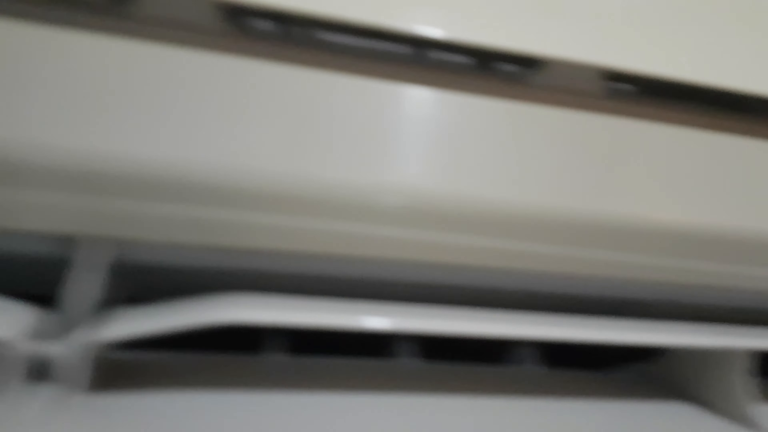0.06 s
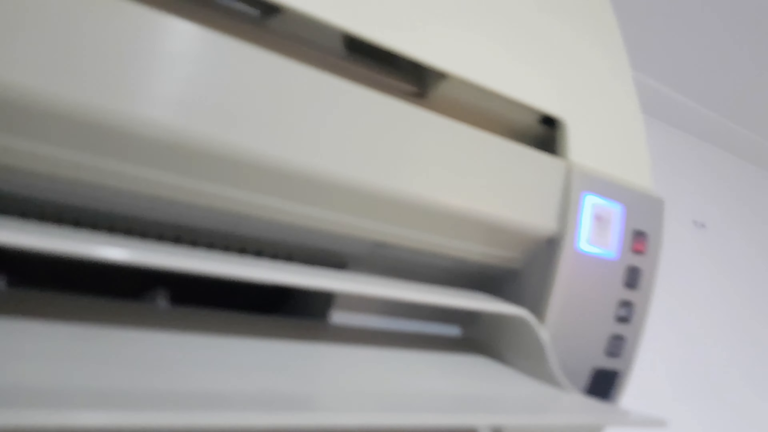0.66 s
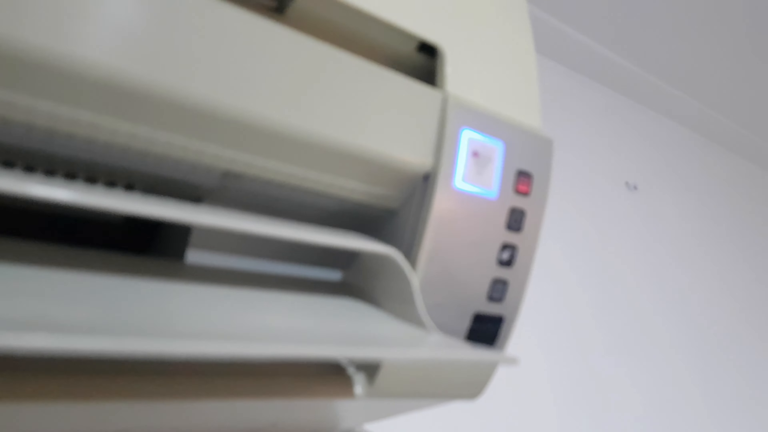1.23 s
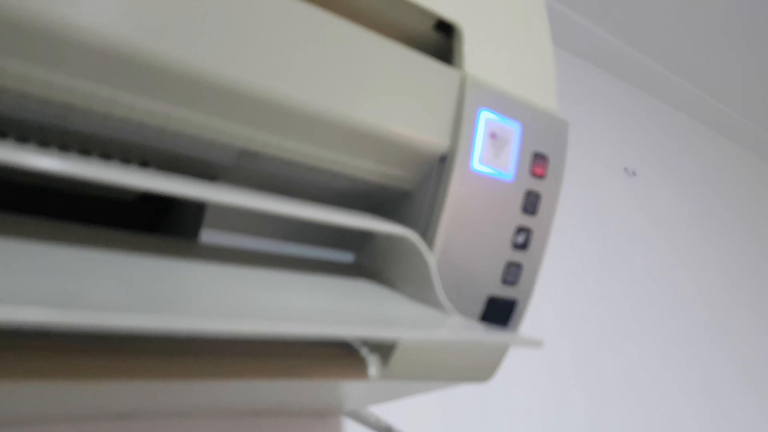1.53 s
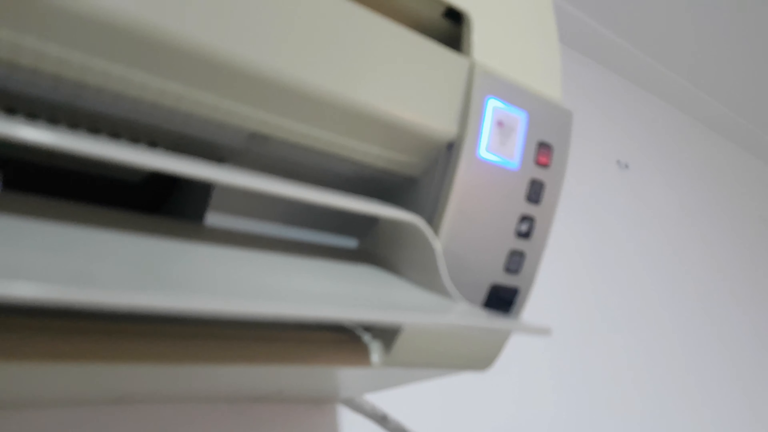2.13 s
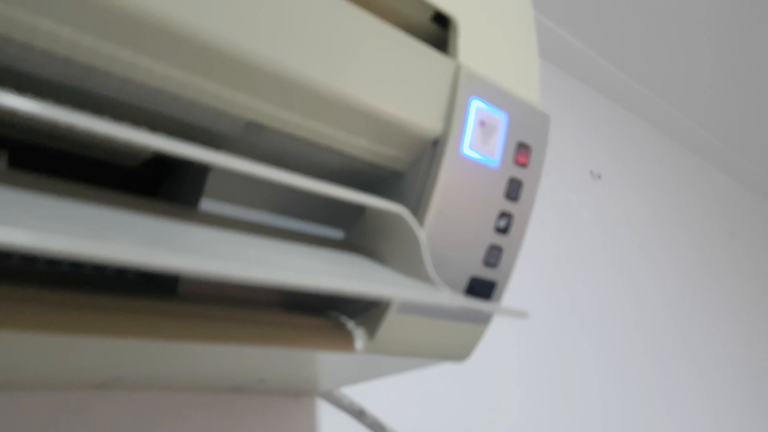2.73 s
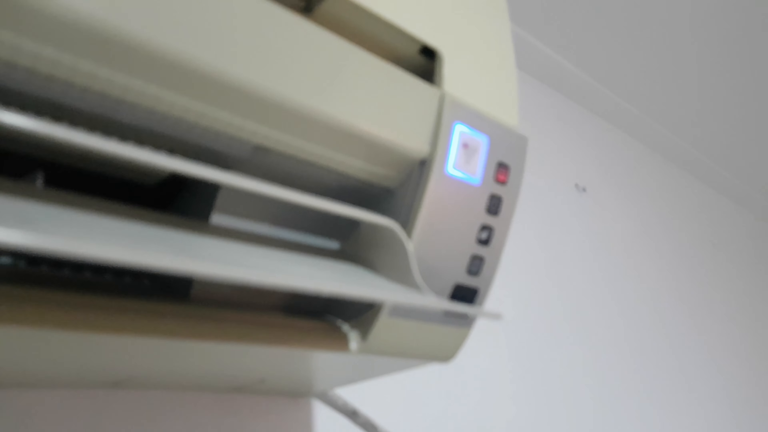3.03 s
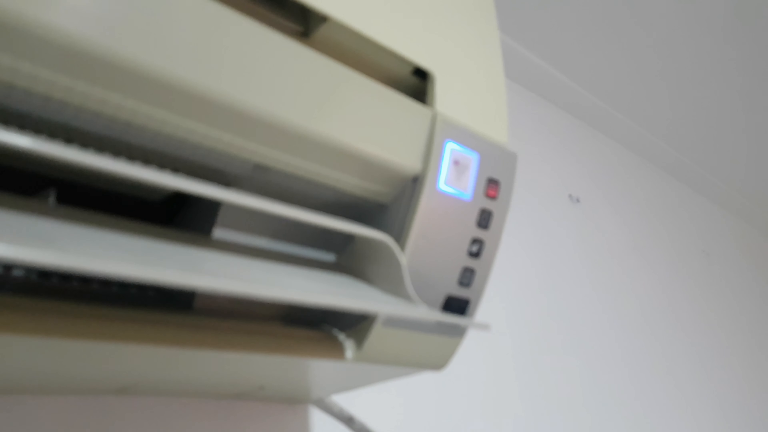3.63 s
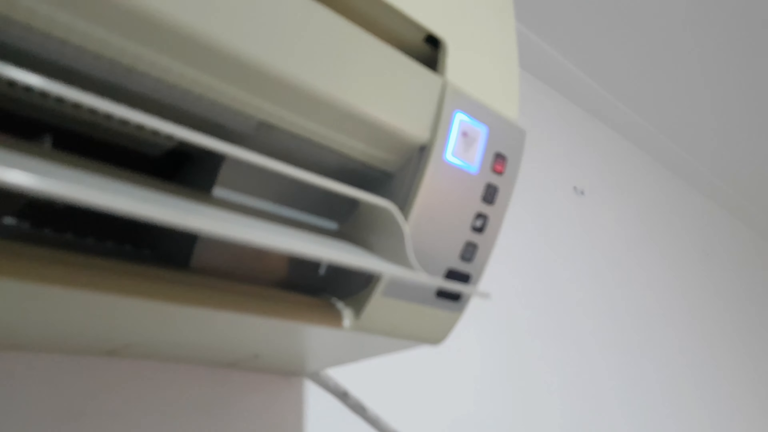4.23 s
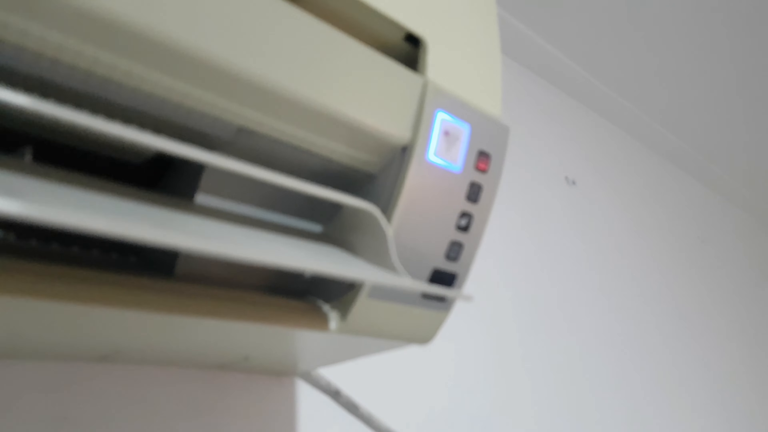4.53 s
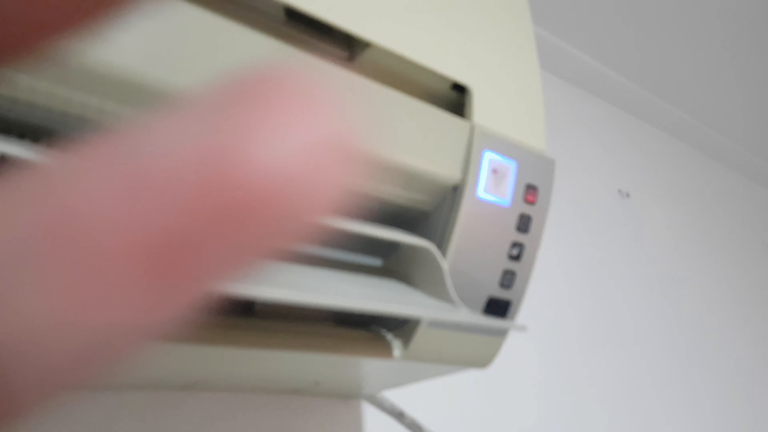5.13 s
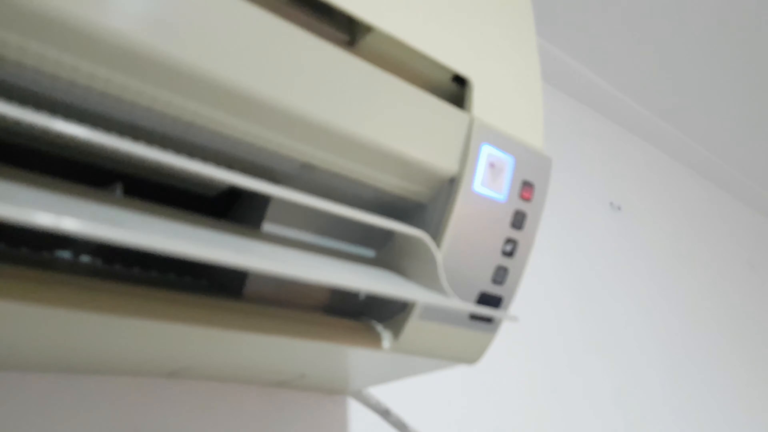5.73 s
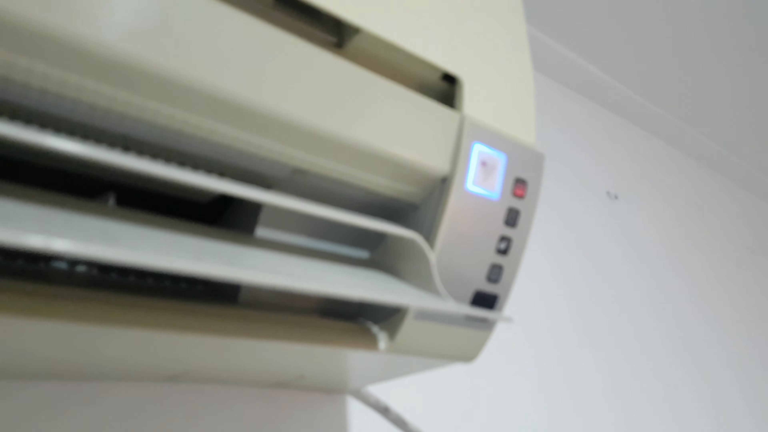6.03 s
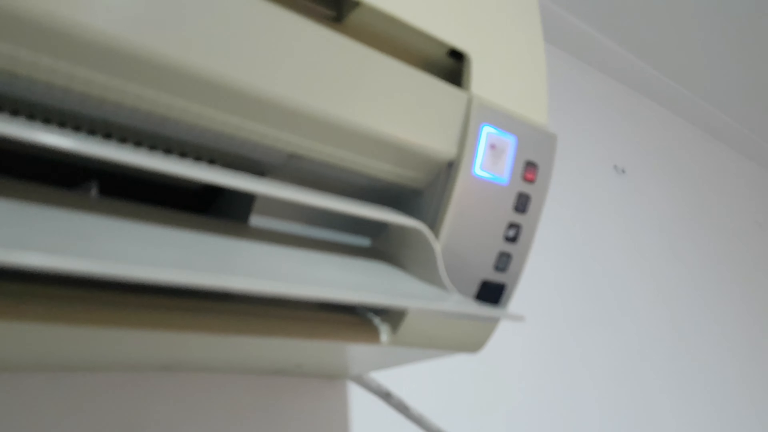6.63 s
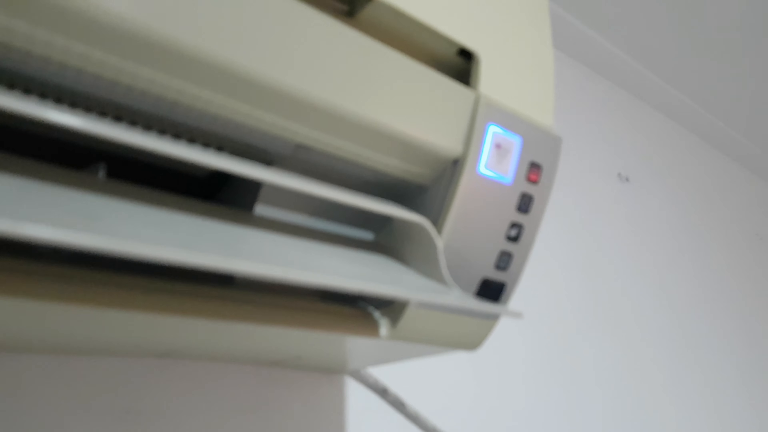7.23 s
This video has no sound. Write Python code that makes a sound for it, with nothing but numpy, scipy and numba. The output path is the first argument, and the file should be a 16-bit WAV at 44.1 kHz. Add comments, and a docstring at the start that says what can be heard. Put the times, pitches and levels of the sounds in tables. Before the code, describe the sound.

From the start, air from a wall air conditioner blows onto a hand-held microphone indoors, making an uneven, fluttering buffet with round thumps and small crackles over a low rumble, a little stronger on the left. Behind it the blower rushes steadily, the vents hiss softly, and a tiny, rapid, high ticking comes and goes very faintly. The wind swells from about 3 seconds, is strongest between 4 and 4.7 seconds, and eases towards 5 seconds, with a brief gust just after. At about 5.3 and 5.6 seconds, two sharp plastic clicks sound close by, mostly on the left, and a few faint crackles follow the second click. The airflow keeps fluttering at a lower level, then builds again from about 6.7 seconds until the end, a little after 7 seconds.

```python
"""A wall air conditioner blows at a hand-held phone. From the start the air stream breaks into eddies on
both microphone ports: a fluttering buffet with round thumps and crackles over a low rumble. Behind it
the blower rushes, the louvres hiss and something in the phone, likely its lens motor, ticks faintly.
The wind swells from about 3 s and eases towards 5 s. At 5.3 and 5.6 s plastic clicks close by, and a
few faint crackles follow the second click; then the wind builds again to the end."""
import sys
import numpy as np
from scipy import signal
from scipy.fft import rfft, irfft, next_fast_len
from scipy.io import wavfile
from scipy.ndimage import uniform_filter1d
from numba import njit

SR = 44100
rng = np.random.default_rng(int(sys.argv[2]) if len(sys.argv) > 2 else 0)


def materialize(psi):
    """Save the field psi as 16-bit PCM at rate SR to the path in sys.argv[1].

    A 1-D psi becomes a single channel; in a 2-D psi each row is a channel.
    """
    bounded = np.clip(np.atleast_2d(psi).T, -1, 1)
    quanta = np.round(bounded * 32767).astype(np.int16)
    wavfile.write(sys.argv[1], SR, quanta)


N = 320607
TIME = np.arange(N) / SR

# The tone of a microphone port. Each row: frequency in Hz, gain in dB.
PORT_RESPONSE = [(30, -16), (100, -5.5), (200, -1.5), (350, -0.5), (600, -3.5), (1100, -3), (2100, -0.5),
                 (2800, -4), (4500, -9), (9000, -32.5), (15000, -47)]


def undb(db):
    """Decibels to gain."""
    return 10 ** (np.asarray(db) / 20)


def curves(table):
    """One envelope per column after the first, which is time in seconds; straight lines between rows."""
    s, *columns = np.transpose(table)
    return [np.interp(TIME, s, c) for c in columns]


def unit_rms(x):
    """Scale each channel to rms 1."""
    return x / np.sqrt(np.mean(x ** 2, axis=-1, keepdims=True))


def pan(pan_db):
    """Constant-power left and right gains; pan is left minus right in dB."""
    gains = undb(np.outer([.5, -.5], pan_db))
    return gains / np.sqrt(np.mean(gains ** 2, axis=0))


def noise():
    """Unrelated white noise for the two ports."""
    return rng.standard_normal((2, N))


def colour(x, points):
    """Equalise along a curve of (Hz, dB) points."""
    hz, db = np.transpose(points)
    size = next_fast_len(N + 4096)
    bins_hz = np.maximum(np.arange(size // 2 + 1) * SR / size, 1)
    gain = undb(np.interp(np.log(bins_hz), np.log(hz), db))
    return irfft(rfft(x, size) * gain, size)[..., :N]


def drift(rate):
    """Smooth random motion of rms 1 for each port, changing about rate times a second."""
    size = max(int(SR / rate), 2)
    smoothed = uniform_filter1d(noise(), size, mode="wrap")
    return unit_rms(uniform_filter1d(smoothed, size, mode="wrap"))


def bounded(x, limit=2):
    """Round off the extremes."""
    return limit * np.tanh(x / limit)


def ring(x, hz, width_hz):
    """A resonance with gain 1 at its centre."""
    return signal.lfilter(*signal.iirpeak(hz, hz / width_hz, fs=SR), x)


def burst(start, rise_s, fall_s):
    """An envelope with exponential attack and decay."""
    age = np.maximum(TIME - start, 0)
    return (1 - np.exp(-age / rise_s)) * np.exp(-np.minimum(age / fall_s, 50))


@njit
def lowpass(x, hz, damping):
    """State-variable low-pass whose corner moves every sample."""
    y, band, low = np.empty(len(x)), 0., 0.
    for i in range(len(x)):
        g = np.tan(np.pi * min(hz[i], .4 * SR) / SR)
        v = (band + g * (x[i] - low)) / (1 + g * (g + damping))
        y[i] = low + g * v
        band, low = 2 * v - band, 2 * y[i] - low
    return y


def lens_motor(first_s=.0332, period_s=.06003, fall_s=.003, scatter_db=1.8, gain_db=12.5):
    """Evenly spaced motor steps, each a tiny rattle in a few high modes."""
    # The ticking's fader. Each row: time in seconds, relative level in dB.
    tick_levels = [(0, -75), (1.0, -67), (1.7, -67), (2.08, -57.5), (2.35, -55), (2.7, -58), (3.0, -59),
                   (3.5, -55.5), (3.7, -67), (4.5, -69), (5.4, -63), (6.4, -69.5), (7.27, -59.5)]
    # The modes that a step rings. Each row: frequency in Hz, width in Hz, gain in dB.
    lens_modes = [(6150, 250, 5), (6600, 250, 4), (7600, 2600, -1), (10750, 200, -2), (11350, 350, 4),
                  (12500, 5000, -22)]
    tick_db, = curves(tick_levels)
    age = (TIME - first_s) % period_s
    steps = noise() * np.exp(-age / fall_s)
    ticks = sum(undb(db) * ring(steps, hz, width) for hz, width, db in lens_modes)
    return ticks * undb(tick_db + gain_db + scatter_db * drift(13)) * pan(2)


def conditioner_noise(direct_share=.12, lag_s=.0005):
    """Air noise at the ports: part comes straight, reaching the left first, the rest via the room."""
    source = rng.standard_normal(N)
    direct = np.array([source, np.roll(source, int(lag_s * SR))])
    return np.sqrt(direct_share) * direct + np.sqrt(1 - direct_share) * noise()


def blower(rush_gain_db=17, hiss_gain_db=-3, waver_db=2.5):
    """The fan wheel's rush, the hiss of air through the louvres, and a thin hiss on the left."""
    # Three faders. Each row: time in seconds, relative levels in dB of rush, louvre hiss and thin hiss.
    air_levels = [(0, -60, -64, -63), (.35, -53.5, -65, -64), (1.2, -52, -76, -58.5), (2, -50, -65, -58.5),
                  (3.5, -49, -63, -60), (4, -50, -82, -57.5), (4.1, -50.5, -74, -61),
                  (4.7, -49.5, -78, -70.5), (5, -54.5, -63.5, -72), (5.5, -54.5, -66, -88),
                  (5.9, -55.5, -67.5, -87), (6.6, -55, -68, -91), (6.9, -50.5, -63, -69),
                  (7.27, -52, -64, -61)]
    # The tone of each layer. Each row: frequency in Hz, spectral level in dB.
    rush_spectrum = [(40, -0.5), (120, -0.5), (400, 10), (800, 3), (1200, -4), (1700, -5.5), (2600, -9.5),
                     (3150, -19.5), (3900, -21), (4800, -29.5), (7000, -31), (12000, -49.5)]
    louvre_spectrum = [(2000, -17), (4500, -2.5), (6500, -1), (8000, -4.5), (9500, -7), (11500, -3.5),
                       (12300, -11), (15500, -8)]
    thin_spectrum = [(3000, -7.5), (5000, 3), (8000, 0), (9800, 3), (11500, -2.5), (12500, -11),
                     (15500, -14)]
    rush_db, louvre_db, thin_db = curves(air_levels)
    rush = unit_rms(colour(conditioner_noise(), rush_spectrum))
    rush *= undb(rush_db + rush_gain_db + waver_db * drift(26))
    louvres = unit_rms(colour(conditioner_noise(), louvre_spectrum)) * undb(louvre_db + hiss_gain_db)
    thin = unit_rms(colour(noise(), thin_spectrum)) * undb(thin_db + hiss_gain_db)
    return rush + louvres + thin * np.array([[1], [0]])


def gusts():
    """The stream's rise and fall in dB: each gust swells out of a short lull and drops into another."""
    # Distinct gusts. Each row: centre in seconds, rise in dB, half length in seconds.
    surges = [(0.128, 1, 0.042), (0.403, 3.5, 0.025), (0.671, 2, 0.07), (1.366, 2.5, 0.022),
              (2.094, 3, 0.055), (2.248, 8, 0.0078), (3.387, 6, 0.017), (3.499, 2, 0.076), (3.662, 1, 0.06),
              (3.827, 1.5, 0.037), (4.107, 3, 0.047), (4.928, 3, 0.072), (5.031, 9.5, 0.044),
              (5.126, 9.5, 0.058), (5.202, 6.5, 0.03), (5.342, 1, 0.083), (5.624, 3, 0.018),
              (5.67, 3, 0.035), (5.96, 5, 0.023), (6.113, 5, 0.016), (6.158, 4, 0.042), (6.376, 6.5, 0.019),
              (6.445, 4.5, 0.041), (6.536, 0.5, 0.03), (6.673, 9, 0.0084), (6.809, 2, 0.015),
              (6.951, 4, 0.019), (7.157, 2, 0.051)]
    swing_db = 0
    for s, rise_db, half_s in surges:
        u = (TIME - s) / half_s
        swing_db += rise_db * (1 - u ** 2) * np.exp(-u ** 2 / 2)
    return swing_db


def wake(flutter_db=2.5, gust_share=.95):
    """Large, slow eddies shed by the phone's body rumble on both ports and surge with the gusts."""
    # The rumble's fader. Each row: time in seconds, base level in dB.
    rumble_levels = [(0, -38), (.4, -34), (.56, -37), (.8, -27.5), (1.1, -31.5), (1.9, -29.5), (2.5, -31),
                     (3.7, -29.5), (4.1, -23.5), (4.7, -25.5), (5.2, -31), (5.9, -33), (6.6, -31.5),
                     (7.27, -30.5)]
    # Its deep tone. Each row: frequency in Hz, spectral level in dB.
    rumble_spectrum = [(15, -15.5), (30, -18), (55, 0.5), (85, 4.5), (125, 5), (190, -1.5), (300, -34.5),
                       (700, -46), (3000, -110)]
    rumble_db, = curves(rumble_levels)
    rumble = unit_rms(colour(noise(), rumble_spectrum))
    return rumble * undb(rumble_db + gust_share * gusts() + flutter_db * drift(14)) * pan(1)


def snap(start, tilt_db, contact_hz=4500, hardness=.14):
    """One click of peak 1: a short push rings heavily damped modes, neighbours in opposite sense."""
    # The click's modes. Each row: frequency in Hz, width in Hz, gain in dB.
    modes = [(597, 380, 7.5), (1116, 1360, .5), (1860, 610, -.5), (2780, 460, -12), (3350, 650, -10),
             (8500, 3500, -19), (12000, 5000, -22)]
    impulse = np.zeros(N)
    impulse[int(start * SR)] = 1
    push = signal.lfilter(*signal.butter(2, contact_hz, fs=SR), impulse + 1e-18) + hardness * impulse
    click = sum((-1) ** k * undb(db + tilt_db * np.log2(hz / modes[0][0])) * ring(push, hz, width)
                for k, (hz, width, db) in enumerate(modes))
    return click / np.abs(click).max()


def faint_crackles():
    """A few small, soft ticks just after the second click."""
    # The ticks. Each row: start in seconds, peak in dB before panning.
    ticks = [(5.595, -24), (5.626, -26), (5.635, -19), (5.658, -24), (5.669, -24), (5.678, -23)]
    return sum(undb(db) * snap(s, tilt_db=1, contact_hz=2200, hardness=0) for s, db in ticks) * pan(6)


def plastic_clicks(scuff_s=5.123, scuff_db=-37, room_delay_s=.011, late_db=-13):
    """A light scuff, then sharp clicks, duller on the right; the panel rings low and the room answers."""
    # The snaps; the first two fuse into one click. Each row: start in seconds, left peak in dB,
    # right share (minus flips polarity), right lag in seconds, brightness in dB per octave,
    # room tail in dB, panel ring in dB.
    snaps = [(5.28565, -3.5, .22, .0002, 2.9, -55, -50), (5.28705, 0, -.45, .0004, -.3, -40, -19),
             (5.5549, .5, .6, .0001, 2.6, -32, -40)]
    # The tone of the room's answer and of the panel's ring. Each row: frequency in Hz, level in dB.
    room_spectrum = [(400, -17), (1500, -7), (2300, 8.5), (2900, 5.5), (3600, -5), (4600, -8.5),
                     (7000, -15.5), (10000, -19), (15000, -30)]
    panel_spectrum = [(300, -31), (600, -1), (900, 1), (1400, -15), (1900, -9), (2600, -33), (6000, -51)]
    room = unit_rms(colour(noise(), room_spectrum))
    panel = unit_rms(colour(noise(), panel_spectrum)) * pan(9)
    scuff = unit_rms(ring(noise(), hz=4800, width_hz=5000))
    out = scuff * undb(scuff_db) * burst(scuff_s, rise_s=.003, fall_s=.005) * pan(10)
    for s, db, right_share, lag_s, tilt_db, tail_db, panel_db in snaps:
        out += undb(db) * np.array([snap(s, tilt_db), right_share * snap(s + lag_s, tilt_db - 1)])
        early = burst(s + room_delay_s, rise_s=.007, fall_s=.015)
        late = burst(s + room_delay_s, rise_s=.007, fall_s=.09)
        out += undb(tail_db) * room * (early + undb(late_db) * late)
        out += undb(panel_db) * panel * burst(s, rise_s=.0025, fall_s=.028)
    return out


def crackles(gain_db=-3.5, centre_hz=1350, spread_octaves=.36, edge_s=.00015):
    """An eddy breaking on the windward port is a pressure spike of about one swing, at a random pitch."""
    # The breaking eddies. Each row: centre in seconds, relative level in dB.
    breaks = [(0.12, -18), (0.151, -15), (.214, -13), (.336, -17), (.431, -13), (.456, -13), (0.659, -18),
              (.806, -20), (0.964, -18), (0.976, -12), (1.124, -17), (1.201, -15), (2.051, -19),
              (2.076, -9), (2.838, -17), (2.968, -9), (2.994, -13), (3.021, -14), (3.142, -11),
              (3.166, -12), (3.209, -6.5), (3.266, -10), (3.613, -12), (3.628, -10), (3.833, -14),
              (4.007, -7.5), (4.068, -11.5), (4.154, -11), (4.294, -16), (4.451, -13), (4.582, -9.5),
              (4.772, -13), (4.794, -15), (5.006, -23), (5.208, -9.5), (5.301, -9), (6.115, -22),
              (6.148, -24.5), (6.520, -18), (7.061, -13), (7.155, -16), (7.168, -19), (7.221, -10.5)]
    spikes = np.zeros(N)
    for (s, db), (pitch, phase) in zip(breaks, rng.uniform(-1, 1, (len(breaks), 2))):
        near = np.abs(TIME - s) < .01
        t = TIME[near] - s
        hz = centre_hz * 2 ** (spread_octaves * pitch)
        spikes[near] += undb(db + gain_db) * np.cos(2 * np.pi * (hz * t + phase)) / np.cosh(t / edge_s)
    return colour(spikes, PORT_RESPONSE) * pan(12)


def thumps(gain_db=-1, wander_turns=.17):
    """Single big eddies shake the ports for a few uneven, round swings, each port in its own phase."""
    # The biggest eddies. Each row: centre in seconds, relative level in dB, pitch in Hz,
    # length in seconds, pan in dB.
    big_eddies = [(0.125, -10.5, 700, .005, 1), (0.15, -10, 547, 0.0056, 0), (0.345, -6, 354, 0.0067, 3),
                  (0.476, -10.5, 413, 0.005, 8), (0.843, -8.5, 450, 0.0044, 4), (.926, -17, 487, 0.0061, 6),
                  (1.349, -20, 410, 0.017, 10), (1.755, -23, 400, 0.0065, 1),
                  (2.119, -13.5, 390, 0.011, 10), (2.848, -11, 435, 0.0044, 11),
                  (2.938, -8, 480, 0.0041, 3), (3.162, -8.5, 564, 0.003, 8), (3.256, -5.5, 440, 0.0046, 1),
                  (3.368, -12, 400, 0.0084, 0), (3.454, -15, 400, 0.005, 5), (3.729, -15, 380, 0.0064, 9),
                  (3.965, -15, 430, 0.0082, -3), (3.986, -6, 626, 0.0015, 2), (4.308, -10, 332, 0.0043, 10),
                  (4.39, -17, 455, 0.0042, 6), (4.641, -7, 504, .005, 5), (5.095, -7.5, 405, 0.008, 6),
                  (5.32, -8.5, 397, 0.0069, 3), (5.531, -16, 410, 0.012, -4), (5.824, -12, 410, 0.01, 8),
                  (6.174, -11.5, 385, 0.018, 6), (6.37, -14, 395, 0.0092, -1), (6.627, -10, 436, 0.0059, 7),
                  (6.767, -7.5, 420, 0.006, 2), (6.792, -4, 366, 0.01, 2), (6.901, -9, 570, 0.0042, 5),
                  (7.115, -7, 406, .008, 2), (7.156, -17, 371, 0.021, -5)]
    wander = wander_turns * drift(450)
    out = np.zeros((2, N))
    for (s, db, hz, length_s, pan_db), phases in zip(big_eddies, rng.random((len(big_eddies), 2, 1))):
        near = np.abs(TIME - s) < .06
        t = TIME[near] - s
        swings = np.cos(2 * np.pi * (hz * t + phases + wander[:, near])) / np.cosh(2 * t / length_s)
        out[:, near] += undb(db + gain_db) * pan(pan_db) * swings
    return out


def stream_force(shared_db=.65, own_db=1.0, lee_swing=1.54):
    """The air's push on each port: slow swell, gusts, and an unsteadiness partly the port's own."""
    # The stream's slow swell. Each row: time in seconds, relative level in dB, pan in dB.
    swell = [(0.0, -17.5, -3), (0.14, -19, -1.5), (0.485, -20, 8), (0.51, -29, 7), (0.75, -22, 4),
             (1.15, -23.5, 5), (1.4, -22.5, 4.5), (2.7, -23.5, 5.5), (2.95, -18, 0.5), (3.35, -18, 4.5),
             (3.75, -18, 1), (4.25, -14.5, 5.5), (4.65, -15.5, 0), (5.15, -19.5, 4), (5.65, -21.5, 4.5),
             (6.55, -22.0, 3), (6.85, -17.5, 4), (7.27, -14.5, 1.5)]
    swell_db, pan_db = curves(swell)
    swing_db = gusts() + shared_db * drift(25)[0] + own_db * drift(25)
    swing_db *= np.array([[1 / lee_swing], [lee_swing]])  # the sheltered right port swings further
    return undb(swell_db + swing_db) * pan(pan_db)


def puffs():
    """The factor by which puffs of faster air quicken the eddies and brighten the buffet."""
    # The puffs. Each row: centre in seconds, rise in pace in dB, half length in seconds.
    fast_air = [(0.136, 1.5, 0.024), (0.214, 1, 0.017), (1.37, 1.5, 0.027), (2.082, 3, 0.015),
                (2.963, 1, 0.076), (3.17, 1, 0.022), (4.45, 0.5, 0.21)]
    return undb(sum(db * np.exp(-((TIME - s) / half_s) ** 2 / 2) for s, db, half_s in fast_air))


def buffet(body_hz=425, upper_hz=1090, edge_hz=880, damping=.81, left_pace=1.117,
           flutter_db=1.85, eddy_db=4.0, spike_db=6.0, cluster_db=3.5, edge_db=-17, gain_db=-1.11):
    """Turbulence on each port: a faster eddy pushes harder and passes sooner, so loud means bright."""
    force = stream_force()
    eddies = undb(flutter_db * drift(71) + eddy_db * bounded(drift(350)))
    # pace scales every filter corner; the left port faces the stream, so its eddies pass faster
    pace = eddies ** .17 * (force / force.mean()) ** .0061 * puffs()
    pace *= np.array([[left_pace], [1 / left_pace]])
    body = np.array([lowpass(lowpass(push, body_hz * p, damping), upper_hz * p, np.sqrt(2))
                     for push, p in zip(noise(), pace)])
    # within each eddy the pressure drops in a few steep edges, which crackle
    edges = np.array([lowpass(push, edge_hz * p, np.sqrt(2)) for push, p in zip(noise(), pace)])
    spikes = undb(spike_db * bounded(drift(1200), limit=5) + cluster_db * bounded(drift(300)))
    edges *= pace * eddies ** .67 * spikes
    pressure = unit_rms(colour(body * eddies, PORT_RESPONSE))
    pressure += undb(edge_db) * unit_rms(colour(edges, PORT_RESPONSE))
    # over each 85 ms the eddies share out the energy that the stream brings
    energy = uniform_filter1d(pressure ** 2, int(.085 * SR))
    return pressure / np.sqrt(energy) * force * undb(gain_db)


def scene():
    """Wind on the ports in front of the running air conditioner, with plastic clicking close by."""
    return (buffet() + wake() + plastic_clicks() + faint_crackles()
            + blower() + lens_motor() + thumps() + crackles())


def record(dry):
    """The phone soft-clips peaks at full scale and cuts the top above 15.6 kHz."""
    clipped = dry / (1 + dry ** 8) ** (1 / 8)
    return signal.sosfilt(signal.ellip(8, .2, 70, 15600, fs=SR, output="sos"), clipped)


dry = scene()
out = record(dry)
materialize(out)
```